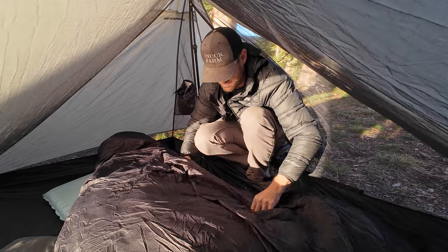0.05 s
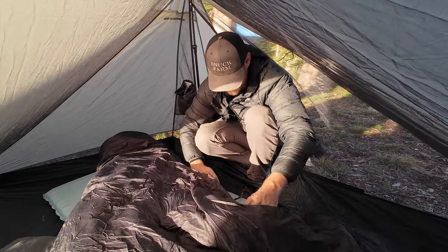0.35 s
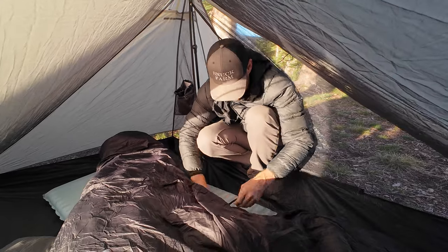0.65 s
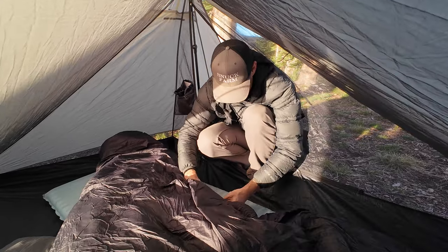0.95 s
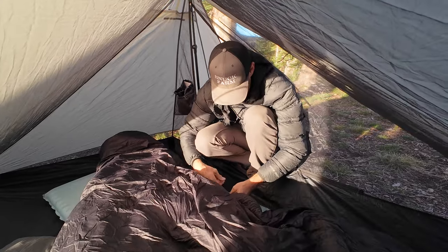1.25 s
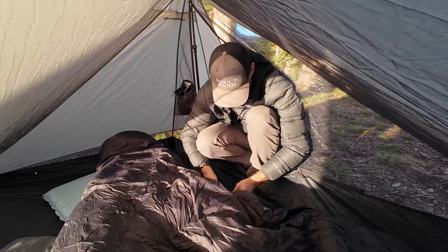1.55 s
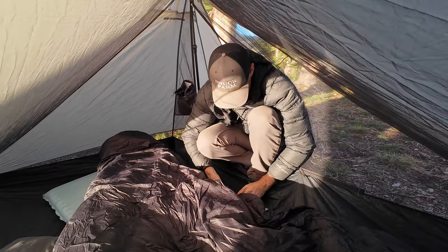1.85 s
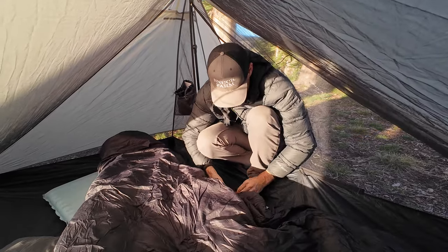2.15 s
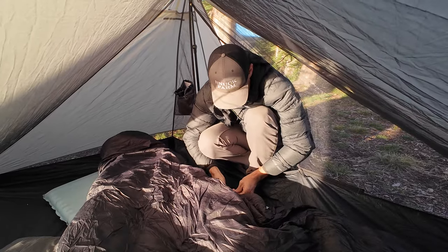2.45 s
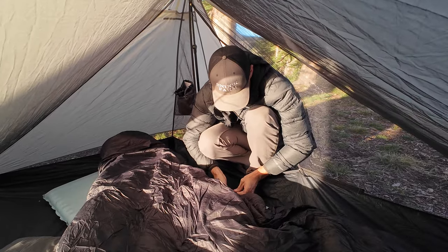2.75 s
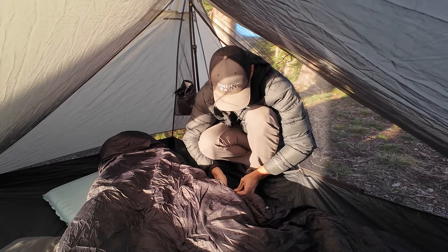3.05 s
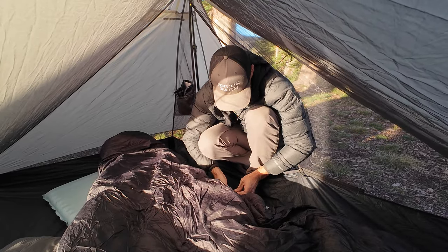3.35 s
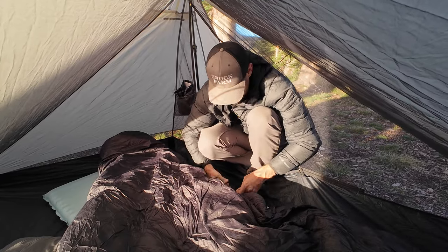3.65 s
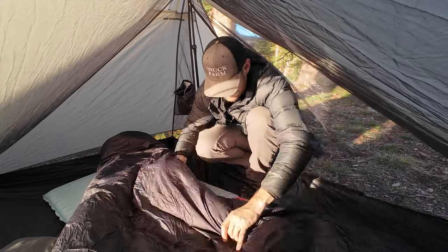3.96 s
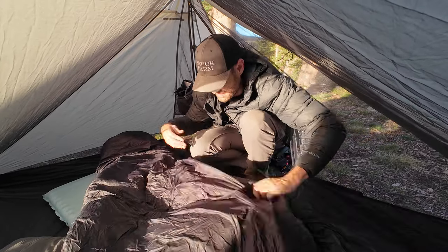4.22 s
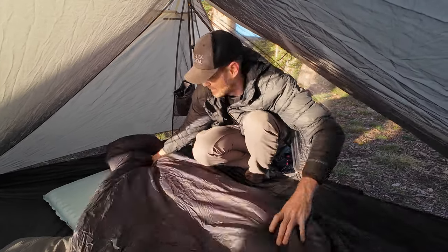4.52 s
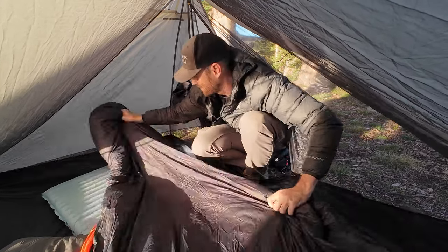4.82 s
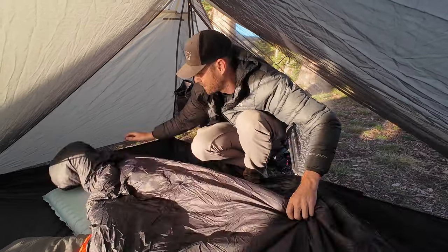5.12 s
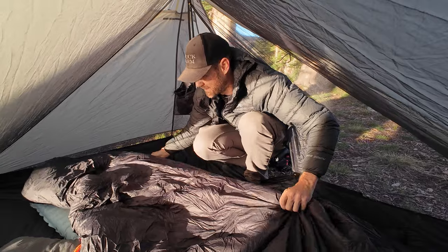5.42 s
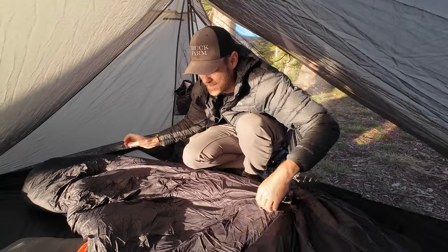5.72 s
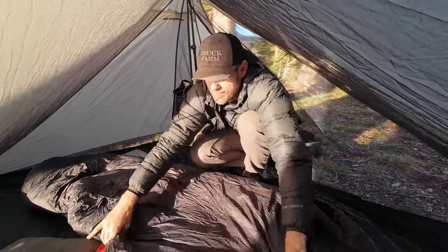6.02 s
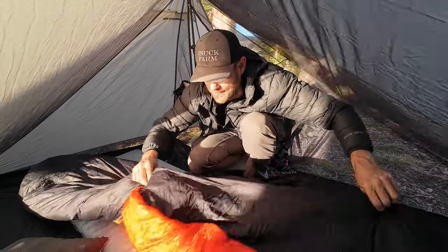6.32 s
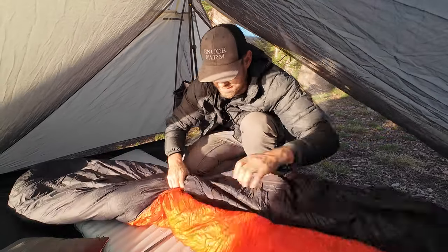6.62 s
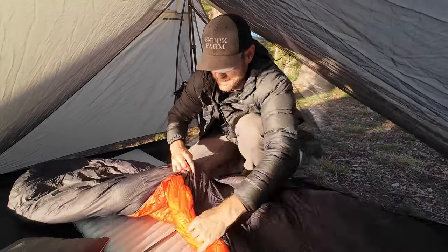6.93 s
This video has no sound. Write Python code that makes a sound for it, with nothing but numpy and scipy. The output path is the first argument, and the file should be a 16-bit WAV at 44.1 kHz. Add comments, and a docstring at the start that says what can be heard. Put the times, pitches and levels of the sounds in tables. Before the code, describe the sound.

A nylon quilt is handled close to the microphone inside a small tent. For the first 2.5 seconds it rustles and crinkles softly, rubbing on an inflatable pad that squeaks faintly around 0.9 seconds and more clearly around 2.2. The fabric then goes almost still while a plastic clip ticks faintly, clicks at 3.2 seconds and snaps shut sharply at 3.5. At 3.8 a hollow thump on the pad starts louder rustling. Another thump comes at 4.6, with a bright sliding hiss until 5. The quilt flaps taut with a crack at 5.3, and the swishing is strongest up to about 5.7, pushing low puffs of air onto the microphone. Two soft bumps follow just after 6 seconds, and the rustling continues to the end at about 7. The fabric walls give a very short echo, over a faint outdoor hush and low air rumble.

```python
"""In a small tent, someone fastens a nylon quilt to an inflatable pad, pulls it up and folds it open.
Friction makes the sliding nylon hiss; its creases buckle and crackle, and loose folds flutter and flap.
The pad squeaks by stick-slip and thumps when bumped; a plastic clip snaps shut and rings.
The fabric walls return a very short echo, and slow air rumbles on the microphone."""
import sys
import numpy as np
from scipy import signal
from scipy.fft import rfft, irfft
from scipy.io import wavfile
from scipy.ndimage import uniform_filter1d

SR = 44100
rng = np.random.default_rng(int(sys.argv[2]) if len(sys.argv) > 2 else 0)


def wav_record(signal):
    """Record a signal, one row per channel, as 16-bit PCM in the file named by sys.argv[1]."""
    frames = np.transpose(np.atleast_2d(signal))
    bounded = np.clip(frames, -1, 1)
    # unit amplitude maps onto the largest positive 16-bit level
    quanta = np.round(bounded * 32767).astype(np.int16)
    wavfile.write(sys.argv[1], SR, quanta)


N = 316638
T = np.arange(N) / SR

# Spectrum of cracking nylon. Each row: frequency in Hz, spectral level in dB.
NYLON_CRACK = [(400, -19), (1200, 5.5), (2500, 10.5), (4200, 10.5), (7200, 1), (10300, 4), (13300, 1),
               (16000, -5)]
# Stereo width of the microphone pair. Each row: frequency in Hz, side minus mid in dB.
STEREO_WIDTH = [(100, -9), (300, -15.5), (1000, -15.5), (2000, -15.5), (4000, -7), (8000, -2), (13000, 2.5)]


def undb(db):
    """Decibels to amplitude ratio."""
    return 10 ** (np.asarray(db) / 20)


def unit(x):
    """Normalisation to rms 1."""
    return x / np.sqrt(np.mean(x ** 2))


def colour(x, points):
    """Spectral shaping by a curve of (Hz, dB) points."""
    hz, db = np.transpose(points)
    f = np.maximum(np.fft.rfftfreq(x.shape[-1], 1 / SR), 1)
    gain = undb(np.interp(np.log(f), np.log(hz), db))
    return irfft(rfft(x) * gain, x.shape[-1])


def wander(rate):
    """Random modulation: ramps between rate new values a second, at rms 1."""
    hold = max(int(SR / rate), 1)
    steps = np.repeat(rng.standard_normal(N // hold + 1), hold)
    return unit(uniform_filter1d(steps, hold)[:N])


def grains(rate, spread_db):
    """Shot noise: two independent trains of tiny slips of unequal size, rate a second."""
    happens = rng.random((2, N)) < rate / SR
    size = undb(spread_db * np.minimum(rng.exponential(size=(2, N)), 5))
    return unit(happens * size * np.sign(rng.standard_normal((2, N))))


def stereo(pair, spectrum):
    """Partial coherence: two independent signals become left and right, alike in bass, apart in treble."""
    mid, side = colour(pair, spectrum)
    side = colour(side, STEREO_WIDTH)
    return np.array([mid + side, mid - side]) / np.std(mid)


def resonate(x, hz, width_hz):
    """Resonance with steep skirts: the same band-pass twice."""
    b, a = signal.iirpeak(hz, hz / width_hz, fs=SR)
    return signal.lfilter(b, a, signal.lfilter(b, a, x))


def ring(modes, t):
    """Damped free vibration; each mode reaches the two microphones at slightly different times."""
    out = 0
    for hz, db, t60 in modes:
        lead_s = rng.uniform(-6.7e-6, 4e-5, (2, 1))
        out = out + undb(db) * np.exp(-np.log(1000) * t / t60) * np.sin(2 * np.pi * hz * (t + lead_s))
    return out


def air(breeze_db=-44.5, gust_right_db=-8, hush_db=-54, diffuse_db=-5):
    """Turbulence buffets each microphone, over faint outdoor hush and a thin hiss of microphone resonance."""
    # Spectra of the buffeting and of the outdoor hush with the microphone's resonance near 13.3 kHz.
    # Each row: frequency in Hz, spectral level in dB.
    buffet_spectrum = [(10, 5), (25, 4.5), (48, -3), (80, -10.5), (130, -28.5), (250, -35), (600, -45.5)]
    hush_and_mic_spectrum = [(30, -2), (60, -9), (120, -11.5), (250, -15.5), (480, -19.5), (750, -25.5),
                             (1300, -25.5), (2600, -29), (5000, -38.5), (7200, -54), (11800, -49),
                             (13300, -38), (14500, -47), (16000, -54)]
    # Air wafted by the quilt. Each row: peak time in seconds, level in dB, half length in seconds.
    wafts = [(0.265, -35, 0.064), (4.28, -46, 0.32), (4.7, -36.5, .1), (5.426, -29.5, 0.11),
             (5.753, -28, 0.13), (6.157, -36, 0.19), (6.412, -34, 0.09)]
    gusts = sum(undb(db) * np.exp(-np.minimum(((T - s) / half) ** 2, 20)) for s, db, half in wafts)
    flow = np.hypot(undb(breeze_db), np.array([gusts, gusts * undb(gust_right_db)]))
    buffets = unit(colour(rng.standard_normal((2, N)), buffet_spectrum))
    mid, side = unit(colour(rng.standard_normal((2, N)), hush_and_mic_spectrum))
    hush = mid + undb(diffuse_db) * np.array([side, -side])
    return buffets * flow * undb(0.58 * wander(10)) + undb(hush_db) * hush


def stroke_levels(swell_power=2.04, fade_power=1.5, resting_db=-75):
    """Incoherent addition: overlapping strokes sum in power, giving rubbing, hiss and flutter in dB."""
    # The quilt is tucked in, clipped, lifted, dropped and smoothed. Each row: peak time, swell and fade
    # in seconds, rubbing level in dB, hiss and flutter in dB relative to the rubbing.
    strokes = [ (0.03, 0.07, 0.095, -39, -9, -1), (0.2, 0.36, 0.52, -40, -1, -12),
               (0.74, 0.17, .13, -40, -8.5, -9.5), (0.95, 0.16, 0.15, -45, 2.5, -11),
               (1.23, 0.082, 0.15, -51, 4.5, -5.5), (1.39, 0.082, 0.056, -47, 2, -26),
               (1.58, 0.11, 0.13, -54, 3.5, -8), (1.76, 0.13, 0.16, -43.5, -3, -13),
               (1.951, 0.15, .11, -42.5, -2.5, -4.5), (2.15, 0.089, 0.13, -42.5, 3.5, -18),
               (2.287, 0.084, 0.052, -38, -3, 5.5), (2.379, 0.031, 0.052, -34, -7, -13),
               (2.48, 0.044, 0.031, -43.5, -3, -10), (2.58, 0.13, 0.26, -58.5, -1, -7),
               (3.05, 0.062, 0.062, -67, -10, 3), (3.52, 0.13, 0.054, -57.5, 0, -5),
               (3.752, 0.095, 0.042, -35, -3, -10), (3.88, 0.073, 0.095, -37.5, -0.5, -12),
               (3.99, 0.06, 0.11, -34, -1, -6), (4.18, 0.16, 0.25, -35, -3, -7.5),
               (4.351, .045, 0.044, -34.5, 1.5, -4.5), (4.47, 0.036, 0.088, -40.5, -1, -19),
               (4.61, 0.082, 0.11, -33.5, 7, -3.5), (4.73, 0.15, 0.12, -33.5, -15, -3),
               (4.87, 0.086, 0.059, -32, 7.5, -12), (4.951, 0.071, 0.076, -36.5, 15.5, -30),
               (5.17, 0.26, 0.41, -38, -3, -7.5), (5.372, 0.028, 0.035, -28.5, -1, -12),
               (5.43, 0.045, 0.074, -28, -4.5, -5.5), (5.54, 0.13, 0.093, -30, -5, -2.5),
               (5.63, 0.041, 0.013, -23.5, -3.5, -6), (5.72, 0.17, 0.16, -36.5, -5.5, -1.5),
               (5.97, 0.14, 0.077, -43.5, 1, -8), (6.07, 0.073, 0.099, -31, -5, -3),
               (6.24, 0.071, 0.11, -34.5, -1.5, -0.5), (6.38, 0.2, 0.2, -33.5, -4.5, -8),
               (6.59, 0.089, 0.047, -34.5, 3.5, -24), (6.709, 0.21, 0.096, -42, -13, -4),
               (6.969, 0.21, 0.24, -37.5, -2.5, -5), (7.16, 0.2, 0.17, -35.5, -13, -9.5)]
    power = np.full((3, N), undb(resting_db) ** 2)
    for s, swell, fade, rub_db, hiss_db, folds_db in strokes:
        away_s = np.abs(T - s)
        falloff = np.where(T < s, (away_s / swell) ** swell_power, (away_s / fade) ** fade_power)
        peaks = undb([[rub_db], [rub_db + hiss_db], [rub_db + folds_db]])
        power += (peaks * np.exp(-np.minimum(falloff, 20))) ** 2
    return 10 * np.log10(power)


def buckles(rate, spread_db, fade_s):
    """Buckling: creases pop one by one, each a noise burst damped by the cloth."""
    pops = grains(rate, spread_db)[0] ** 2
    energy = signal.lfilter([1], [1, -np.exp(-1 / (fade_s * SR))], pops + 1e-18)
    return unit(np.sqrt(energy) * rng.standard_normal((2, N)))


def sliding(rub_db, hiss_db):
    """Sliding friction of nylon on nylon: the weave slips and creases buckle more often with speed."""
    # Spectra of rubbing and of sliding hiss, the latter brightened near 13.3 kHz by the microphone's
    # resonance. Each row: frequency in Hz, spectral level in dB.
    rub_spectrum = [(300, -4), (520, -18), (750, -7.5), (1050, -1), (1500, -1.5), (1950, 1), (2600, 0.5),
                    (3900, 1.5), (5000, -3), (6200, -5), (7200, -7), (10000, -6), (16000, -39)]
    hiss_and_mic_spectrum = [(2000, -19.5), (4500, -4.5), (6200, -5), (7100, -6), (8500, -3.5),
                             (10300, -0.5), (11800, -3.5), (12700, 1.5), (13350, 2.5), (14100, -1.5),
                             (15700, -13), (17000, -37)]
    speed = undb(0.36 * (rub_db - rub_db.max()))
    rub = stereo(grains(rate=18000 * speed, spread_db=1.4), rub_spectrum)
    rub *= undb(rub_db - 1 + 0.29 * wander(50))
    creases = stereo(buckles(rate=450 * speed, spread_db=5, fade_s=0.0011), NYLON_CRACK)
    creases *= undb(rub_db - 11.5)
    hiss = stereo(grains(rate=30000 * speed, spread_db=1), hiss_and_mic_spectrum)
    hiss *= undb(hiss_db - 1 + 1.6 * wander(60))
    return rub + creases + hiss


def near_reflections(x, mirror_db=-18):
    """Comb filtering: floor and roof mirror the cloth along paths that change as it moves."""
    out = x
    for lag_s in (.0012, .0023, .0037):
        emitted_s = T - lag_s * (1 + .1 * wander(4))
        out = out + undb(mirror_db) * np.array([np.interp(emitted_s, T, channel) for channel in x])
    return out * np.std(x) / np.std(out)


def crinkles(rub_db, relative_db=-12):
    """Buckling of larger creases: sparser pops that stand out of the rubbing."""
    pops = buckles(rate=77, spread_db=0.1, fade_s=0.0021)
    return stereo(pops, NYLON_CRACK) * undb(rub_db + relative_db)


def flutter(folds_db):
    """Cushioned impacts: loose, padded folds tumble over each other in low pats."""
    # Spectrum of the pats. Each row: frequency in Hz, spectral level in dB.
    pat_spectrum = [(50, -27), (110, -5), (170, -9.5), (240, -2.5), (320, -6.5), (480, -3.5), (720, -10.5),
                    (1080, -7), (2000, -12.5), (5000, -26)]
    return stereo(grains(rate=1100, spread_db=1.5), pat_spectrum) * undb(folds_db + 1.36 * wander(40))


def pad_rub(rub_db, wander_db=6):
    """Forced vibration: cloth drags on the pad's skin, whose resonances come and go as the hand shifts."""
    # Firmness of contact with the pad. Each row: time in seconds, level in dB relative to the rubbing.
    contact = [(0, -8.5), (.75, -4.5), (1.9, -6.5), (2.15, 2.5), (2.5, -5), (3.8, -4), (4.5, -10.5),
               (7.18, -9.5)]
    # Resonances of the taut skin. Each row: frequency in Hz, width of one band-pass in Hz, gain in dB.
    skin_resonances = [(446, 36, -3.5), (593, 145, -3), (1337, 245, -1.5), (1494, 190, -0.5),
                       (2340, 530, -1), (2847, 54, 3), (3670, 330, -3), (4600, 510, -4.5), (6320, 210, -1)]
    contact_db = np.interp(T, *np.transpose(contact))
    slips, skin = grains(rate=2300, spread_db=4), 0
    for hz, width_hz, db in skin_resonances:
        skin = skin + resonate(slips, hz, width_hz) * undb(db + wander_db * np.tanh(wander(14)))
    return stereo(skin, [(150, 14), (400, 1.5), (6500, -5), (12000, -2)]) * undb(rub_db + contact_db)


def flaps(swell_over_fade=0.33):
    """Sudden tension: a panel gathers speed and is jerked taut; its filling thuds and its shell cracks."""
    # Each row: peak time in seconds, thud level in dB, crack level in dB, fade in seconds.
    jerks = [(0.344, -39, -44, 0.01), (1.874, -46, -35, .004), (2.064, -36, -33.5, .003),
             (2.126, -41, -28.5, 0.0036), (2.215, -36, -33.5, 0.013), (3.638, -69, -35.5, 0.025),
             (3.761, -25.5, -25.5, .004), (3.859, -49, -37, 0.0067), (4.092, -29, -30, .0037),
             (4.157, -29, -26, 0.0027), (4.206, -51, -24.5, .004), (4.591, -31, -37, 0.012),
             (4.714, -34.5, -36, 0.018), (5.175, -35.5, -45, .01), (5.299, -17.5, -19.5, 0.0032),
             (5.319, -31, -25, 0.011), (5.365, -29, -31, 0.02), (5.634, -18.5, -33, 0.008),
             (6.207, -28, -46, 0.0072), (6.248, -29, -38, 0.011), (6.44, -41, -38, 0.012)]
    # Spectrum of the thud. Each row: frequency in Hz, spectral level in dB.
    thud_spectrum = [(60, -1), (150, 3.5), (250, 3.5), (330, 4.5), (450, -4), (720, -11), (1080, 1.5),
                     (2000, -22), (4000, -16), (12000, -42)]
    thud, crack = np.zeros((2, N))
    for s, thud_db, crack_db, fade in jerks:
        falloff = np.maximum((s - T) / swell_over_fade, T - s) / fade
        envelope = np.exp(-np.minimum(falloff, 20))
        thud += undb(thud_db) * envelope
        crack += undb(crack_db) * envelope
    filling = stereo(grains(rate=8400, spread_db=2.5), thud_spectrum)
    shell = stereo(grains(rate=13000, spread_db=-1.5), NYLON_CRACK)
    return thud * filling + crack * shell


def pad_squeaks(width_hz=300):
    """Stick-slip: cloth catches on the pad, and a patch of skin squeaks in a narrow band of noise."""
    # Each row: peak time in seconds, frequency in Hz, level in dB, half length in seconds.
    catches = [(0.797, 2900, -47.5, 0.15), (0.92, 3760, -47, 0.096), (0.957, 1500, -46, 0.05),
               (1.37, 3550, -50, 0.045), (2.146, 1360, -41.5, 0.036), (2.263, 1450, -37, 0.058),
               (2.278, 456, -35.5, 0.067), (2.385, 3100, -38, 0.023), (2.575, 2520, -62, 0.053)]
    out, count = np.zeros(N), SR // 2
    for s, hz, db, half in catches:
        start = int(s * SR) - count // 2
        span = slice(start, start + count)
        squeak = unit(resonate(rng.standard_normal(count), hz, width_hz))
        out[span] += squeak * undb(db) * np.exp(-((T[span] - s) / half) ** 2)
    return out


def clip_clicks(crack_s=0.0052, rise_s=0.0016):
    """Snap-through: the catch springs over its ridge with a crack, and the small plastic part rings."""
    clicks = [(2.536, -54, .9), (2.598, -54, .9), (2.627, -56, .9), (2.699, -59, .9), (2.781, -58, .7),
              (3.1832, -33.5, 0.2), (3.226, -55, .7), (3.425, -58, 0.6), (3.4655, -21, 0.98)]
    clip_modes = [(3565, 1.5, 0.026), (5500, -13, 0.022), (6100, -14, .03), (7840, -14, 0.043),
                  (8880, 0, 0.023), (9700, -5, 0.043), (10500, -6, 0.032), (12000, -7, .028),
                  (13400, -3, 0.036), (13800, 2, 0.033), (14250, -11, .03)]
    # Crack of the catch. Each row: frequency in Hz, spectral level in dB.
    snap_spectrum = [(500, -26), (1750, -13), (2100, -2), (2500, 0), (3050, -19), (3600, -5), (4300, -2.5),
                     (6400, 1), (8000, -4), (10600, -1), (13400, 1), (16000, -3.5)]
    t, out = T[:SR // 8], np.zeros((2, N))
    onset = 1 - np.exp(-(t / rise_s) ** 2)
    for s, db, hardness in clicks:
        crack = stereo(rng.standard_normal((2, len(t))), snap_spectrum) * np.exp(-t / crack_s)
        click = 0.8 * ring(clip_modes, t) + 1.97 * hardness * crack
        start = int(s * SR)
        out[:, start:start + len(t)] += undb(db) * click * onset
    return out


def pad_bumps(push_s=0.0029):
    """Cavity resonance: a soft blow draws a hollow thump from the pad's air chambers."""
    # A hand or the quilt bumps the pad. Each row: start in seconds, level in dB.
    bumps = [(3.76, -24), (3.7681, -23), (4.589, -19.5), (4.713, -29), (5.296, -32), (5.633, -30),
             (6.059, -25), (6.245, -21.5)]
    # Each row: frequency in Hz, level in dB, 60 dB decay time in seconds.
    chamber_modes = [(240, -10.5, 0.16), (302, 0.5, 0.063), (394, 4.5, 0.026), (474, -7, 0.044),
                     (630, -6, .045)]
    t, out = T[:SR // 5], np.zeros((2, N))
    for s, db in bumps:
        start = int(s * SR)
        out[:, start:start + len(t)] += undb(db) * ring(chamber_modes, t) * (1 - np.exp(-t / push_s))
    return out


def tent(x, t60, wet_db, first_s):
    """Diffuse reflection: close fabric walls add a short echo that decays exponentially."""
    t = T[:SR // 5]
    onset = np.clip(t / first_s - 1, 0, 1)
    echo = rng.standard_normal((2, len(t))) * np.exp(-np.log(1000) * t / t60) * onset
    echo /= np.sqrt(np.sum(echo ** 2, axis=1, keepdims=True))
    mid, side = signal.fftconvolve(x, echo, axes=1)[:, :N]
    side = colour(side, STEREO_WIDTH)
    return x + undb(wet_db) * np.array([mid + side, mid - side])


def scene(uneven_db=0.24, left_minus_right_db=-0.6):
    """Superposition: unevenly sliding cloth, pad and clip sound in the tent, over the moving air."""
    rub_db, hiss_db, folds_db = stroke_levels() + uneven_db * wander(28)
    cloth = near_reflections(sliding(rub_db, hiss_db)) + crinkles(rub_db) + flutter(folds_db) + flaps()
    pad = pad_rub(rub_db) + pad_squeaks() + pad_bumps()
    pan = undb([[left_minus_right_db / 2], [-left_minus_right_db / 2]])
    bedding = tent((cloth + pad) * pan, t60=0.11, wet_db=-13, first_s=0.0033)
    clip = tent(clip_clicks(), t60=0.071, wet_db=-18.5, first_s=0.0076)
    return bedding + clip + air()


def record(dry, top_hz=15900):
    """Frequency response: the two microphones differ a little in colour, and the top is cut steeply."""
    # Each row: frequency in Hz, left minus right in dB.
    imbalance = [(100, 1.3), (1000, 0), (3000, 1.2), (5500, 1), (9000, -1.5), (14000, -2.5)]
    left = colour(dry[0], [(hz, db / 2) for hz, db in imbalance])
    right = colour(dry[1], [(hz, -db / 2) for hz, db in imbalance])
    low_pass = signal.ellip(10, .2, 70, top_hz, fs=SR, output="sos")
    return signal.sosfilt(low_pass, np.array([left, right]))


dry = scene()
out = record(dry)
wav_record(out)
```